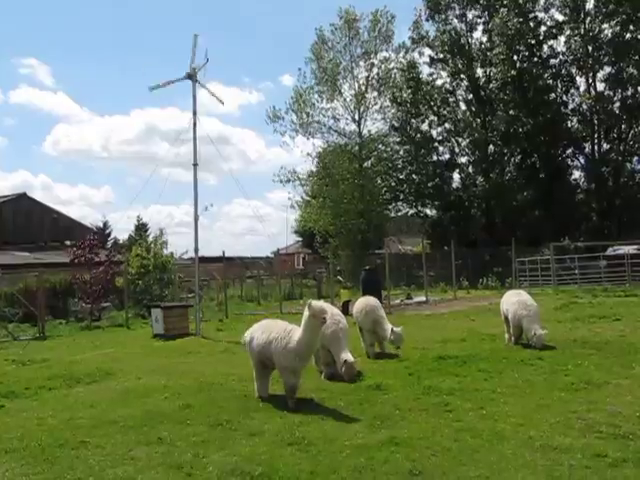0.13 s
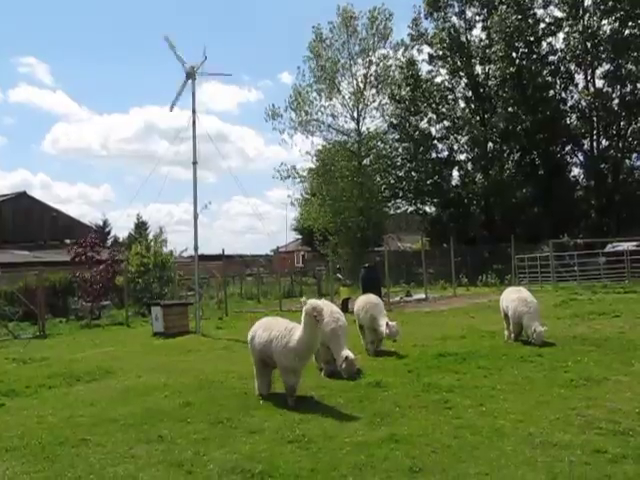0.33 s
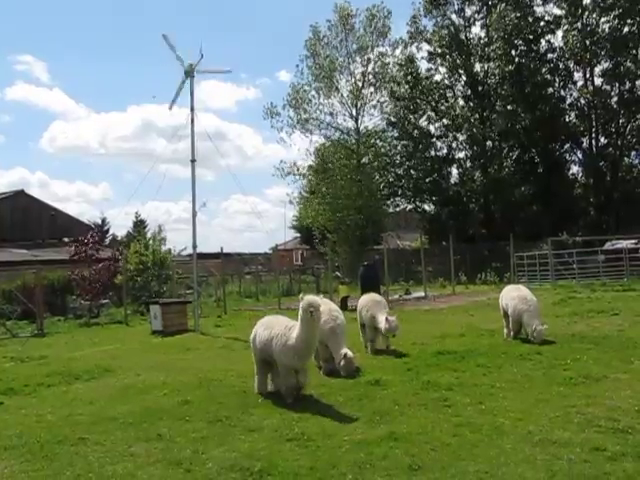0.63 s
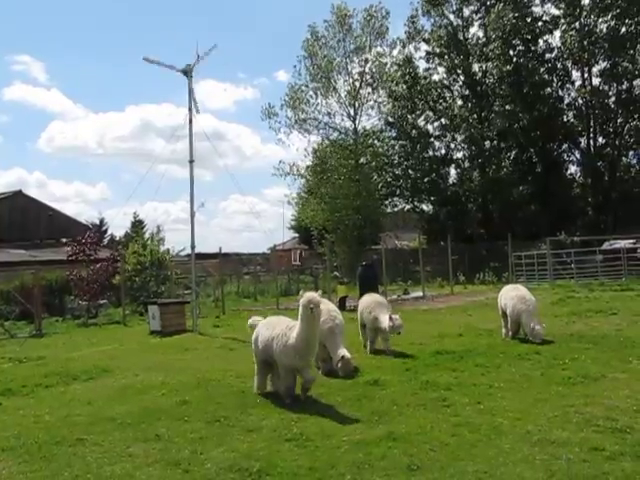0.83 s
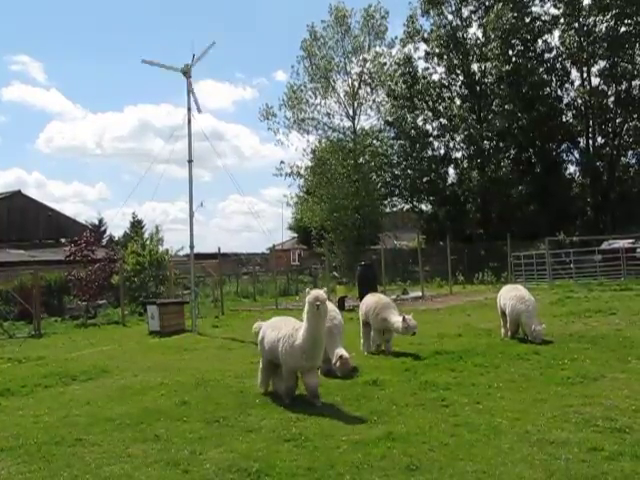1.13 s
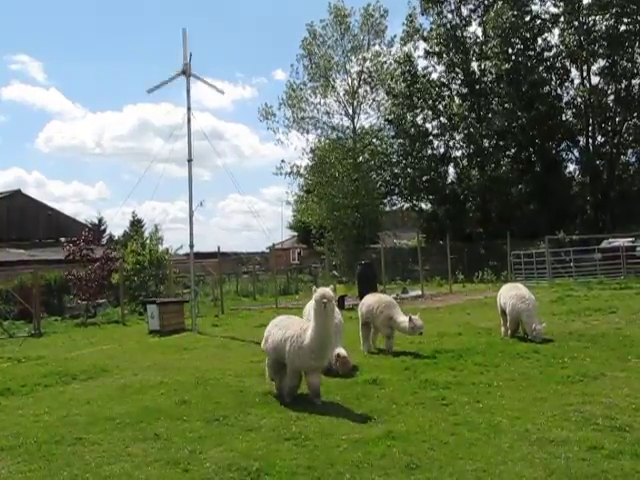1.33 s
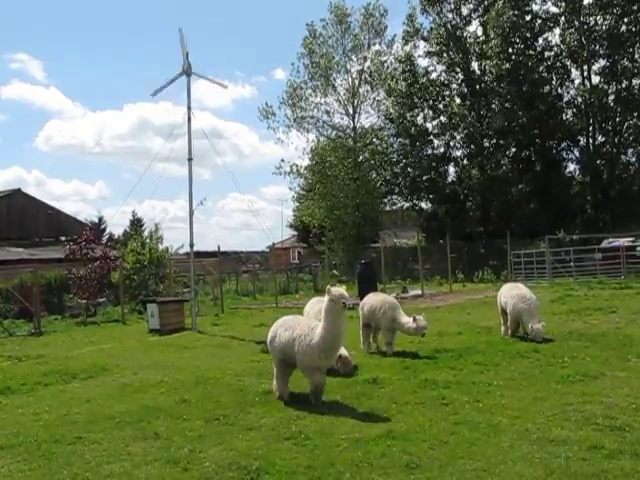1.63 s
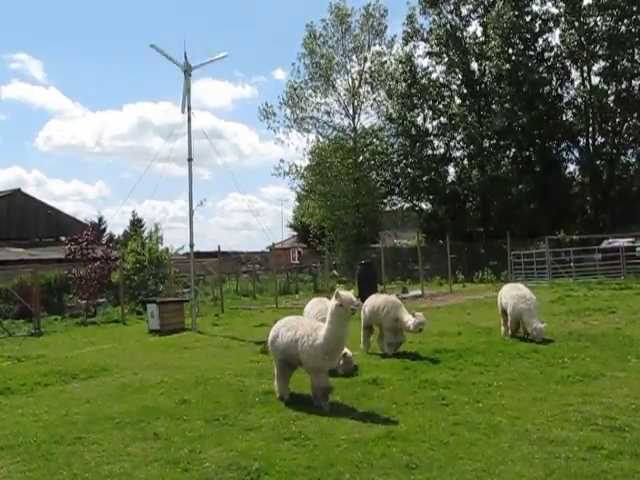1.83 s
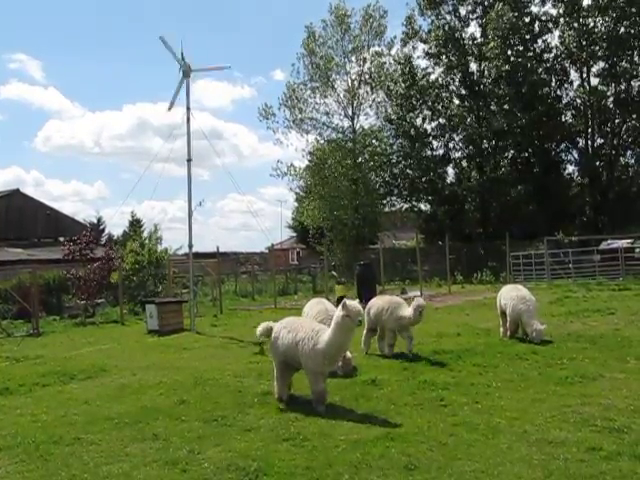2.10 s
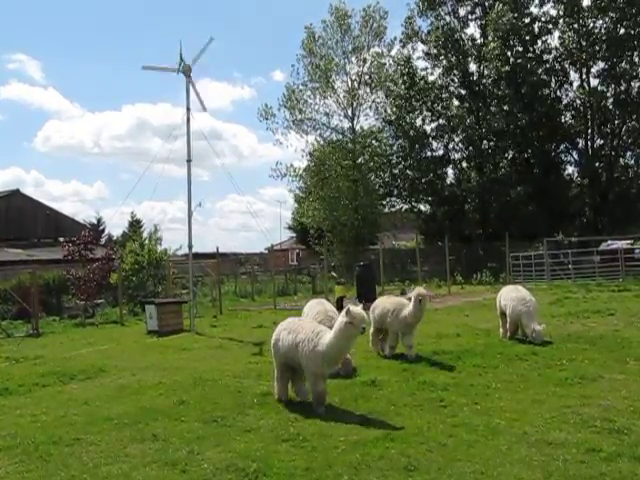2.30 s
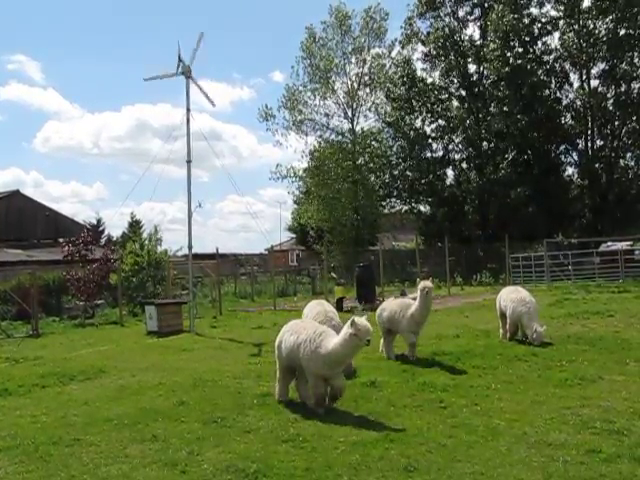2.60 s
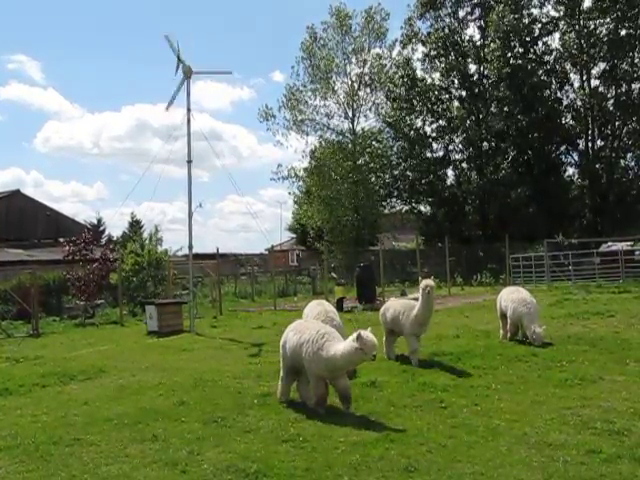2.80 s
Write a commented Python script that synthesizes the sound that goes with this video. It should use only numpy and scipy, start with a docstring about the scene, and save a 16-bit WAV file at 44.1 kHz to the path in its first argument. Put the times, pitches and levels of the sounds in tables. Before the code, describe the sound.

Uneven gusts of wind rumble and thump on an outdoor stereo microphone, peaking midway and then easing. A soft hiss of leaves swells in the background, with a few faint, distant bird chirps and then tiny twig ticks.

```python
"""A breezy paddock, with a stereo microphone standing out in the wind. Gusts buffet its two ports,
the exposed right one hardest, with a lumpy rumble that opens up as they peak. Behind it a row of
tall trees hisses ever louder as the wind fills the leaves; a small bird chirps far off and a few
twigs tick."""
import sys
import numpy as np
from scipy import signal
from scipy.fft import rfft, irfft
from scipy.io import wavfile
from scipy.ndimage import uniform_filter1d

SR = 44100
rng = np.random.default_rng(int(sys.argv[2]) if len(sys.argv) > 2 else 0)


def int16_out(signal):
    """Quantize to a 16-bit WAV file."""
    q = np.round(np.clip(np.atleast_2d(signal).T, -1, 1) * 32767)
    wavfile.write(sys.argv[1], SR, q.astype(np.int16))


N = 130095


def from_db(db):
    """Decibels to gain."""
    return 10 ** (np.asarray(db) / 20)


def rms_one(x):
    """Scale to unit power."""
    return x / np.sqrt(np.mean(x ** 2) + 1e-20)


def in_time(rows):
    """Read (seconds, value) rows at every sample."""
    return np.interp(np.arange(N) / SR, *np.transpose(rows))


def at_hz(points, hz):
    """Read a table on a log-frequency axis."""
    f, value = np.transpose(points)
    return np.interp(np.log(hz), np.log(f), value)


def pan(db):
    """Left and right gains for a left-minus-right level."""
    return from_db(np.array([[db], [-db]]) / 2)


def drift(hz):
    """A smooth random wander of unit power, mostly slower than hz."""
    step, settle = 40, 2000
    pole = np.exp(-2 * np.pi * hz * step / SR)
    noise = rng.standard_normal(N // step + settle + 2)
    slow = signal.lfilter([1], [1, -2 * pole, pole * pole], noise)[settle:]
    return np.interp(np.arange(N) / step, np.arange(len(slow)), rms_one(slow))


def band(x, low, high):
    """Butterworth band-pass."""
    return signal.sosfilt(signal.butter(2, [low, high], "band", fs=SR, output="sos"), x)


# A small bird far off, a little to the right. Each row: start in seconds, length in seconds,
# first, middle and last pitch in Hz, level in dB before the echo.
BIRD_NOTES = [(0.528, 0.036, 4640, 4670, 3620, -54), (.572, 0.012, 3690, 3880, 3750, -47.5),
              (.602, 0.038, 3520, 4000, 3480, -49), (0.644, 0.028, 3430, 3440, 3280, -55),
              (1.282, 0.035, 5500, 5400, 5480, -58), (1.34, 0.019, 5460, 5220, 4800, -64),
              (1.855, .03, 4260, 4840, 4950, -56)]


def distant_bird(warble_share=0.012, echo_db=1, echo_t60_s=0.16):
    """Short whistles with a rough warble, scattered by the trees."""
    song = np.zeros(N)
    for start, length, first, middle, last, db in BIRD_NOTES:
        u = np.linspace(0, 1, int(length * SR))
        hz = np.polyval(np.polyfit([0, .5, 1], [first, middle, last], 2), u)
        hz = hz * (1 + warble_share * drift(hz=250)[:len(u)])
        swell = from_db(db) * np.sqrt(np.abs(np.sin(np.pi * u)))
        i = int(start * SR)
        song[i:i + len(u)] += swell * np.sin(2 * np.pi * np.cumsum(hz) / SR)
    t = np.arange(SR // 2) / SR
    scatter = rng.standard_normal((2, len(t))) * np.exp(-np.log(1000) * t / echo_t60_s)
    scatter = scatter / np.linalg.norm(scatter, axis=1, keepdims=True)
    echo = from_db(echo_db) * signal.fftconvolve(song[None], scatter)[:, :N]
    return (song + echo) * pan(-2.5)


# Faint twigs, heard in the centre. Each row: start in seconds, level in dB, pitch in Hz.
TWIG_TICKS = [(1.696, -56, 7000), (2.168, -57, 6100), (2.442, -40.5, 3620)]
# What a twig rings with. Each row: multiple of its pitch, relative level in dB.
WOOD_MODES = [(.29, -0.5), (1, 0), (1.19, -2), (1.68, -14)]


def twigs(t60_s=0.022):
    """Dry ticks: a few wooden modes that die at once."""
    out = np.zeros(N)
    t = np.arange(SR // 10) / SR
    for start, db, hz in TWIG_TICKS:
        ring = sum(from_db(db + mode_db) * np.sin(2 * np.pi * hz * ratio * t)
                   for ratio, mode_db in WOOD_MODES)
        i = int(start * SR)
        out[i:i + len(t)] += ring * np.exp(-np.log(1000) * t / t60_s)
    return out


# Wind rising in the far row of trees. Each row: time in seconds, level in dB.
TREE_WIND = [(0, -50), (.5, -49), (1.0, -48), (1.6, -47), (2.0, -46.5), (2.35, -45), (2.65, -43),
             (2.95, -42)]
# The leaves in full wind. Each row: frequency in Hz, relative spectral density in dB.
LEAF_SPECTRUM = [(100, -7.5), (200, -8), (300, -2), (350, 0), (520, -4), (630, -8.5), (900, -4.5),
                 (1040, -10), (1270, -9.5), (1800, -10.5), (2310, -8.5), (3610, -9), (5380, -15.5),
                 (6250, -17), (11930, -34), (15300, -43.5)]
# How each range follows the wind. Each row: frequency in Hz, dB of hiss per dB of wind.
LEAF_RESPONSE = [(300, 1.27), (1000, 1.035), (3500, 0.81), (6000, 0.89), (12000, 1.02)]
# How alike the hiss is at the two ports. Each row: frequency in Hz, likeness from 0 to 1.
LEAF_COHERENCE = [(200, 1), (700, 1), (1500, 0.76), (3000, 0.53), (6000, 0.49), (12000, .15)]


def leaves(left_lag_s=.00007, flutter_hz=4.3):
    """Countless far leaves merge into a wide hiss that fills out and flutters with the wind."""
    hz = np.maximum(np.fft.rfftfreq(N, 1 / SR), 1)
    white = rfft(rng.standard_normal((3, N)))
    alike = at_hz(LEAF_COHERENCE, hz)
    lag = np.exp(-2j * np.pi * hz * np.array([[left_lag_s], [0]]))
    colour = rms_one(from_db(at_hz(LEAF_SPECTRUM, hz)))
    hiss = (np.sqrt(alike) * white[2] * lag + np.sqrt(1 - alike) * white[:2]) * colour
    wind_db, together, out = in_time(TREE_WIND), drift(flutter_hz), 0
    centres = np.geomspace(250, 14000, 9)
    for centre, weights in zip(centres, np.eye(len(centres))):
        hiss_band = irfft(hiss * np.interp(np.log(hz), np.log(centres), weights), N)
        swing_db = at_hz(LEAF_RESPONSE, centre) * (wind_db - wind_db.max())
        flutter_db = (together + drift(flutter_hz)) / 2
        out = out + hiss_band * from_db(swing_db + flutter_db)
    return out * from_db(wind_db.max()) * pan(-0.9)   # the trees stand to the right


def port_pressure(gust, buffets):
    """Each buffet swells and dies as a bell on top of the gust: level and extra rasp, both in dB."""
    t, power, rasp_db = np.arange(N) / SR, from_db(in_time(gust)) ** 2, 0
    for peak_s, width_s, peak_db, edge_db in buffets:
        bell = .5 ** ((2 * (t - peak_s) / width_s) ** 2)
        power = power + from_db(peak_db) ** 2 * bell
        rasp_db = rasp_db + edge_db * bell
    return 10 * np.log10(power), rasp_db


# Rumble right at a port. Each row: multiple of the eddy rate, relative spectral density in dB.
RUMBLE_SPECTRUM = [(.1, -12), (.3, -3.5), (.65, 2.5), (1, -1.2), (1.5, -11), (2.2, -22.5), (4, -36.5),
                   (8, -53), (20, -71.5)]
GUST_REFERENCE_DB, EDDY_OCTAVES_PER_DB = -18, 0.03   # harder gusts are brighter


def port_rumble(gust, buffets, eddy_rate, shared, tilt_db_per_octave=0, likeness=0.22):
    """Turbulence at one port: half-octave bands of eddies whose roll-off rises with the gust."""
    level_db, rasp_db = port_pressure(gust, buffets)
    eddy_hz = in_time(eddy_rate) * 2 ** (EDDY_OCTAVES_PER_DB * (level_db - GUST_REFERENCE_DB))
    white = np.sqrt(likeness) * shared + np.sqrt(1 - likeness) * rng.standard_normal((2, N))
    edges_hz = 20 * 2 ** np.arange(0, 7.1, .5)
    sputter_db = 4 * drift(hz=220)   # the small eddies come in quick bursts
    out, power = 0, 0
    for k, (low, high) in enumerate(zip(edges_hz, edges_hz[1:])):
        ratio = np.sqrt(low * high) / eddy_hz
        octaves = np.log2(ratio)
        gain = from_db(at_hz(RUMBLE_SPECTRUM, ratio) + tilt_db_per_octave * octaves) * np.sqrt(high - low)
        bursts = from_db((rasp_db + sputter_db) * np.clip(octaves, 0, 2) / 2)
        eddies = rms_one(band(band(white[k % 2], low, high), low, high))
        out = out + gain * bursts * eddies
        power = power + gain ** 2
    out = out / np.sqrt(power)
    steady = out / np.sqrt(uniform_filter1d(out ** 2, size=SR // 45) + 1e-9)
    lumps_db = 1.5 * drift(hz=30)
    return steady * from_db(level_db + lumps_db)


# Gusts on the sheltered left port and the exposed right one. Each row: time in seconds, level in dB.
LEFT_GUSTS = [(0.05, -38), (0.16, -47), (0.26, -46), (0.34, -40), (0.45, -32), (0.51, -38), (0.56, -29),
              (0.72, -41), (0.81, -41), (0.89, -26), (0.95, -28.5), (1.03, -27.5), (1.16, -29.5),
              (1.34, -36.5), (1.43, -30), (1.52, -24), (1.64, -28), (1.77, -41.5), (1.99, -35),
              (2.06, -29.5), (2.2, -27), (2.27, -37), (2.31, -43), (2.5, -40), (2.54, -34.5), (2.71, -40.5),
              (2.93, -37.5)]
RIGHT_GUSTS = [(0.05, -25), (0.22, -26), (0.3, -27.5), (0.35, -22.5), (0.42, -25.5), (0.49, -25.5),
               (0.56, -28.5), (0.66, -21.5), (0.79, -24.5), (0.87, -23), (0.93, -15.5), (1.0, -27),
               (1.16, -17), (1.21, -24.5), (1.36, -19.5), (1.47, -18), (1.57, -15.5), (1.67, -18.5),
               (1.74, -26), (1.84, -20.5), (1.89, -28.5), (1.99, -32), (2.025, -27.5), (2.06, -35),
               (2.12, -25.5), (2.3, -27), (2.41, -29), (2.46, -24), (2.55, -26), (2.67, -23.5), (2.71, -34),
               (2.84, -36.5), (2.93, -31)]
# Rate of the smallest strong eddies, above which the rumble falls away; the sheltered port hears
# larger, slower ones. Each row: time in seconds, rate in Hz at the reference gust level.
LEFT_EDDIES = [(0.05, 90.5), (0.35, 62), (0.8, 98), (1.12, 136.5), (1.251, 149), (1.55, 134), (1.85, 115),
               (2.08, 74.4), (2.93, 91)]
RIGHT_EDDIES = [(0.05, 124), (0.22, 165), (0.4, 150), (0.48, 149), (0.63, 180), (0.72, 154), (0.86, 130),
                (1.029, 154.5), (1.22, 145.8), (1.5, 140), (1.68, 123), (1.85, 133), (2.03, 94),
                (2.14, 135), (2.22, 122), (2.35, 101), (2.5, 115), (2.93, 92.5)]
# Single eddies that slap a port. Each row: time of the peak in seconds, width in seconds,
# peak level in dB, extra rasp in dB.
LEFT_BUFFETS = [(0.336, .03, -30, 5), (1.006, 0.022, -18.5, 4), (1.085, 0.017, -20, -1),
                (1.129, 0.011, -15, 3), (1.402, .035, -18, -4), (2.055, 0.02, -23, -7),
                (2.105, .03, -26, 3.5), (2.255, 0.028, -28, 0)]
RIGHT_BUFFETS = [(0.115, 0.014, -15, -15), (0.167, 0.0091, -17.5, -5), (0.198, 0.017, -26, 5),
                 (0.402, 0.036, -21, 4), (.578, 0.046, -22, 6.5), (0.632, 0.022, -17, -0.5),
                 (0.7, 0.0058, -12.5, -1), (0.761, 0.012, -21.5, 0), (.84, 0.034, -21, 5),
                 (0.902, 0.017, -12.5, -14), (0.931, 0.017, -19, 9.5), (0.96, 0.036, -15, 4.5),
                 (1.02, 0.03, -13, 10), (1.053, 0.02, -11, -6), (1.08, 0.026, -22.5, 14),
                 (1.129, 0.032, -9.5, 3.5), (1.17, 0.034, -10.5, -4.5), (1.25, 0.02, -15, 6.5),
                 (1.288, 0.018, -15.5, -9), (1.328, 0.017, -13, -8), (1.387, 0.013, -12, 4),
                 (1.437, 0.048, -15.5, 5), (1.468, 0.01, -27, 8), (1.505, 0.015, -11.5, 5),
                 (1.53, .02, -12, 2.5), (1.622, 0.0094, -15, -13), (1.654, 0.0083, -11.5, -8),
                 (2.098, 0.021, -14, -11.5), (2.138, 0.016, -14.5, -3), (2.185, 0.018, -17.5, -9),
                 (2.264, 0.028, -19, -6.5), (2.366, 0.023, -19.5, -14), (2.486, 0.018, -19.5, -10),
                 (2.618, 0.047, -24, -11)]


def wind_on_microphone():
    """Wind strikes both ports; each has mostly its own turbulence."""
    shared = rng.standard_normal((2, N))
    left = port_rumble(LEFT_GUSTS, LEFT_BUFFETS, LEFT_EDDIES, shared, tilt_db_per_octave=2)
    right = port_rumble(RIGHT_GUSTS, RIGHT_BUFFETS, RIGHT_EDDIES, shared)
    return np.array([left, right])


def scene():
    """Wind on the microphone, in front of the trees, the bird and the twigs."""
    return wind_on_microphone() + leaves() + distant_bird() + twigs()


def record(dry, silence_s=.034, fade_s=.004, cutoff_hz=15800):
    """The sound opens after a moment of silence; the highest treble is cut."""
    opening = np.clip((np.arange(N) / SR - silence_s) / fade_s, 0, 1)
    low_pass = signal.ellip(10, .1, 80, cutoff_hz, fs=SR, output="sos")
    return signal.sosfilt(low_pass, dry * opening)


dry = scene()
out = record(dry)
int16_out(out)
```